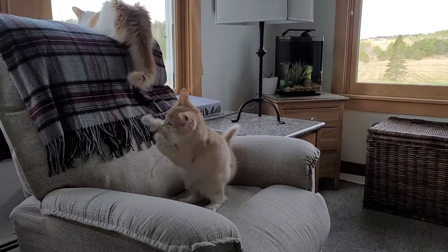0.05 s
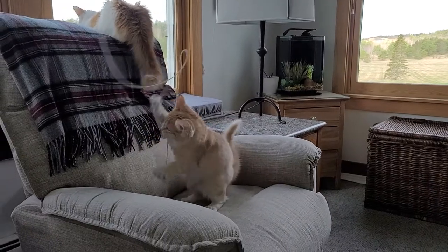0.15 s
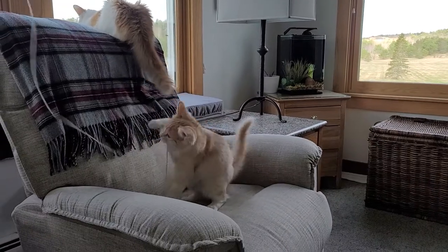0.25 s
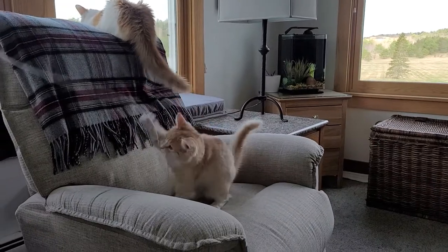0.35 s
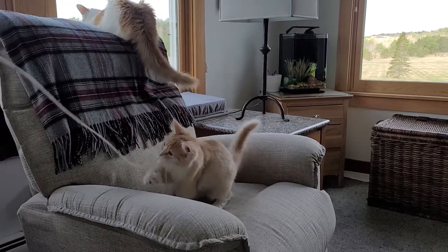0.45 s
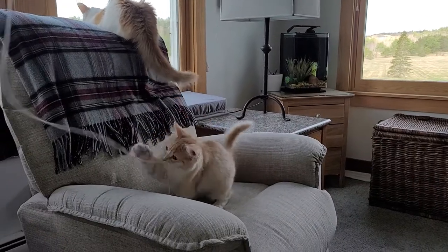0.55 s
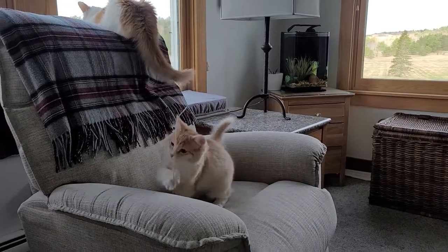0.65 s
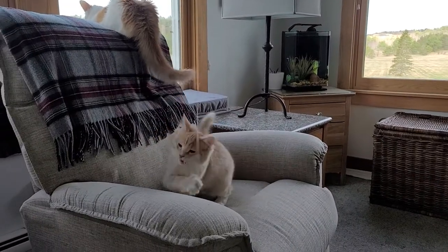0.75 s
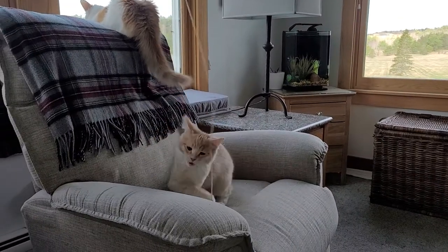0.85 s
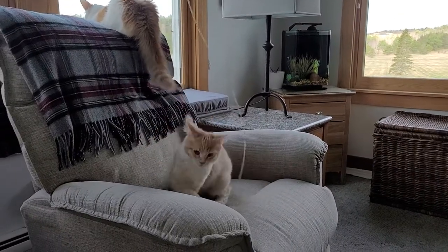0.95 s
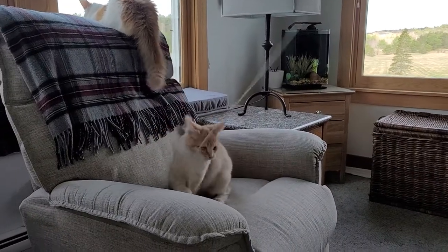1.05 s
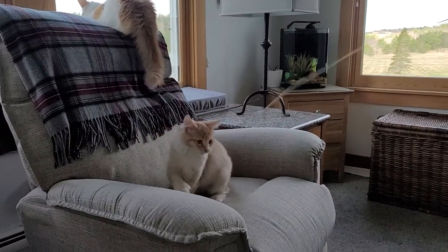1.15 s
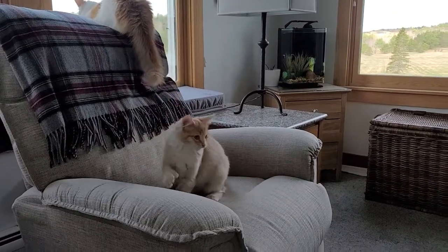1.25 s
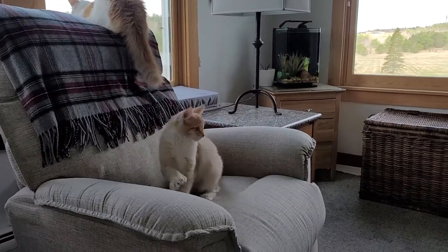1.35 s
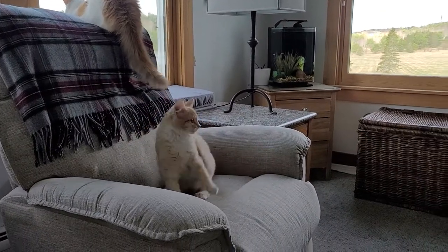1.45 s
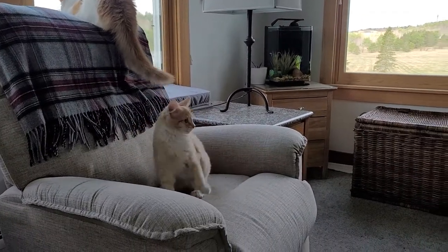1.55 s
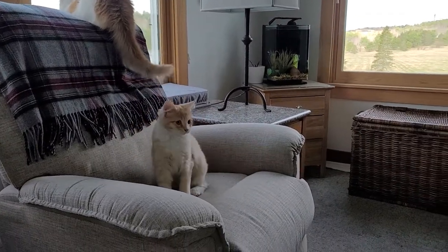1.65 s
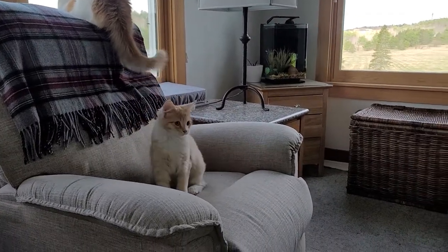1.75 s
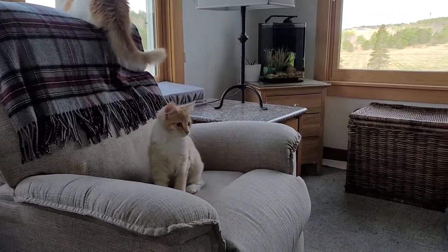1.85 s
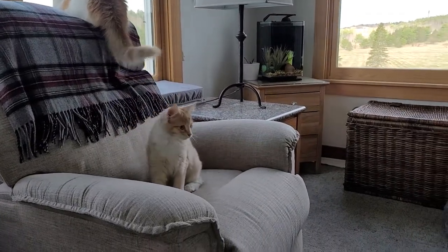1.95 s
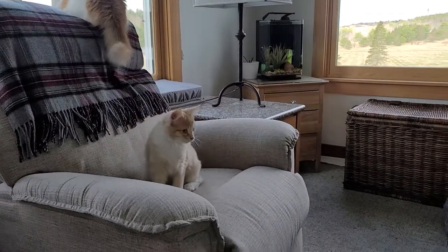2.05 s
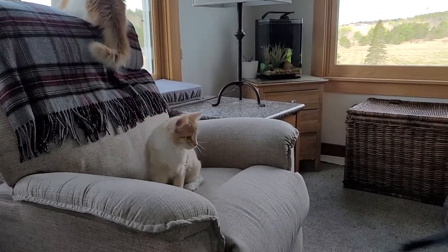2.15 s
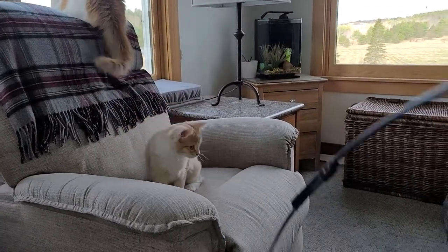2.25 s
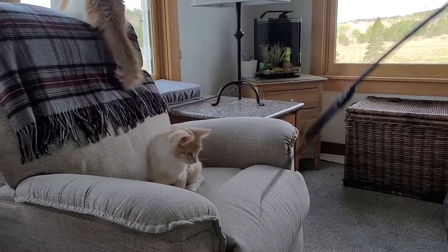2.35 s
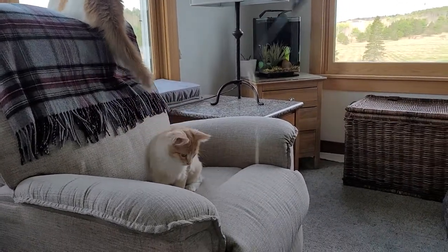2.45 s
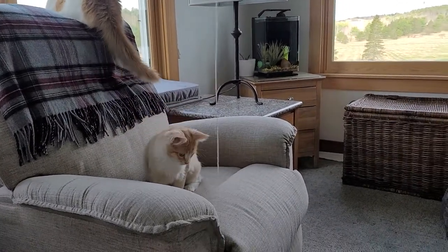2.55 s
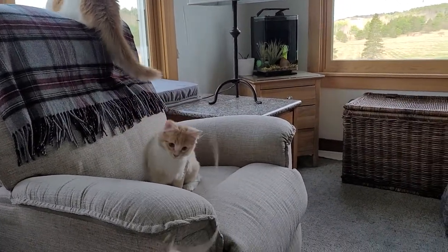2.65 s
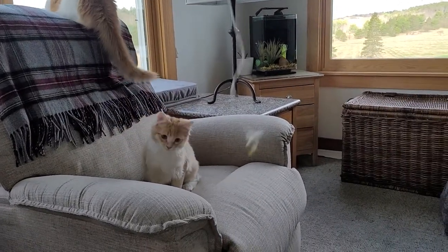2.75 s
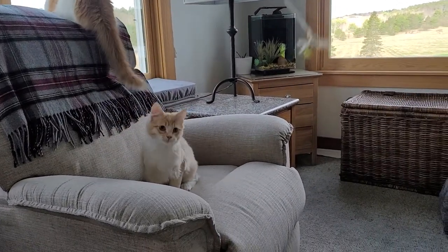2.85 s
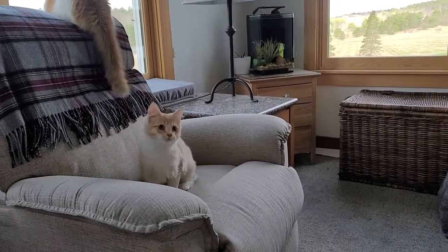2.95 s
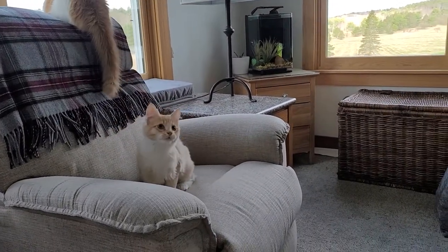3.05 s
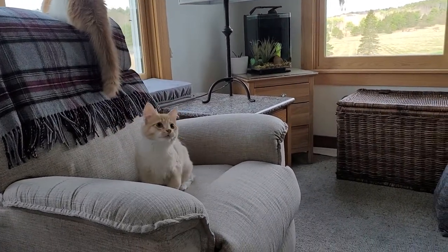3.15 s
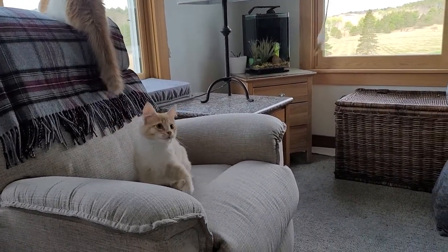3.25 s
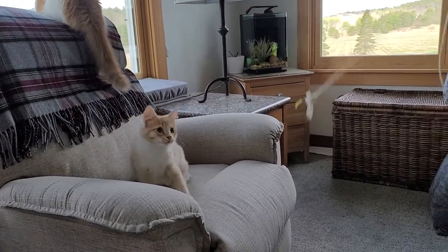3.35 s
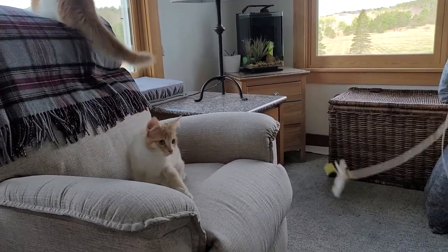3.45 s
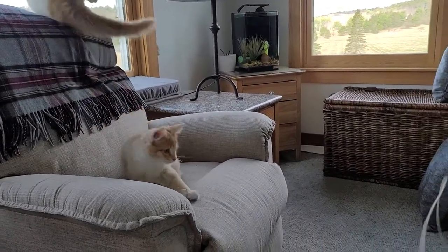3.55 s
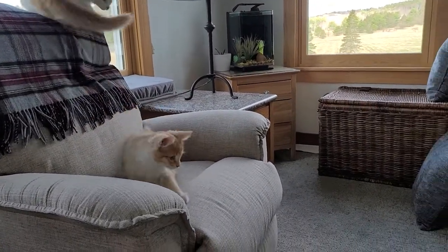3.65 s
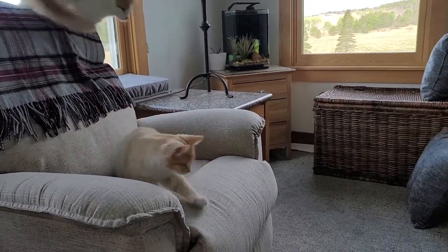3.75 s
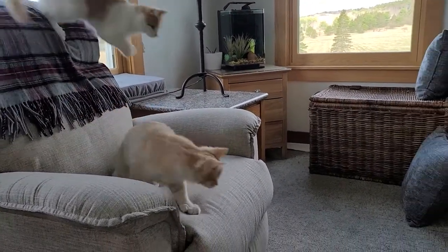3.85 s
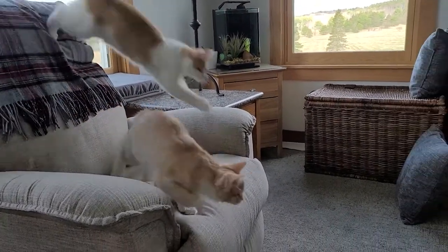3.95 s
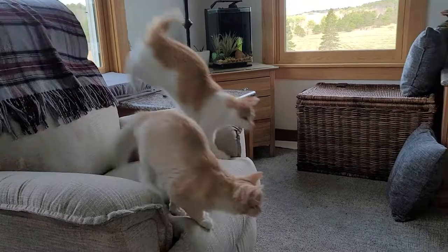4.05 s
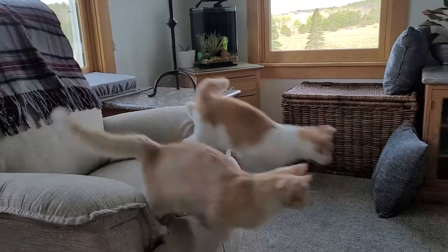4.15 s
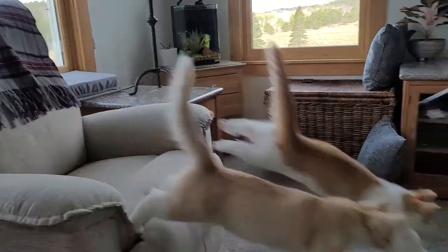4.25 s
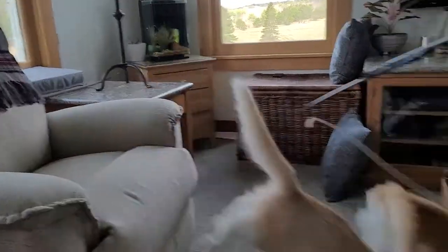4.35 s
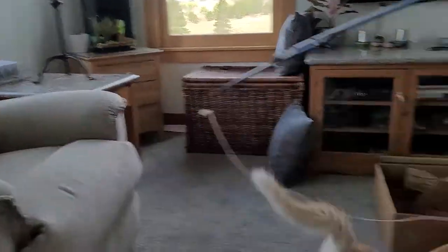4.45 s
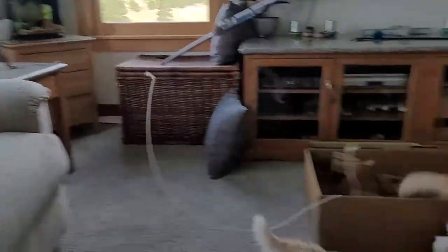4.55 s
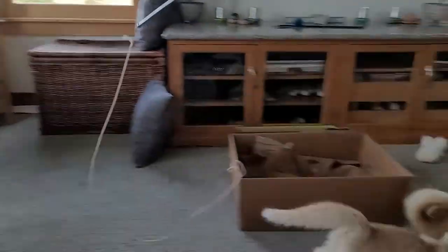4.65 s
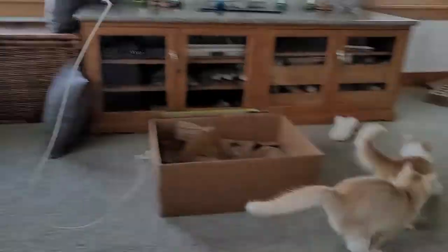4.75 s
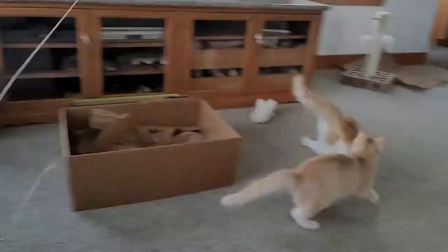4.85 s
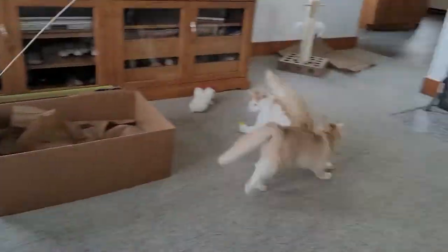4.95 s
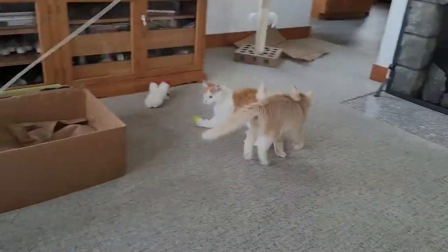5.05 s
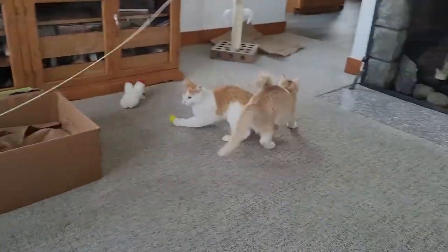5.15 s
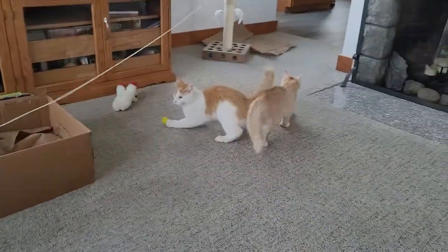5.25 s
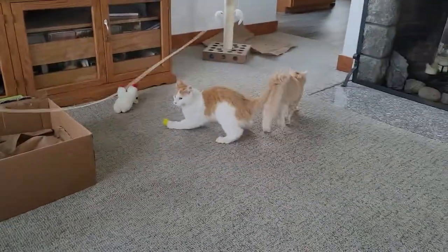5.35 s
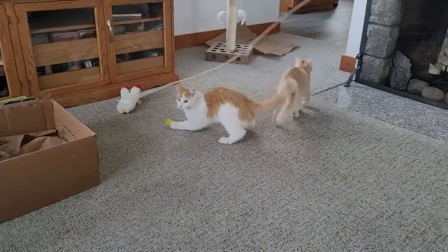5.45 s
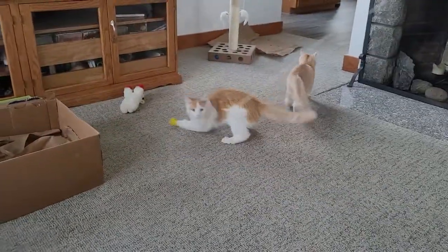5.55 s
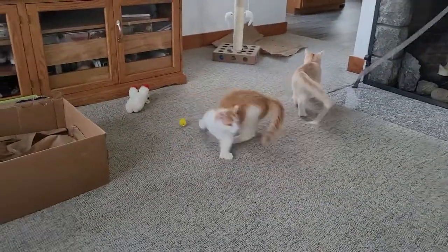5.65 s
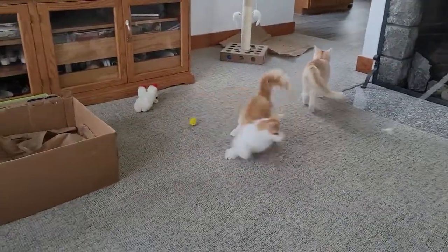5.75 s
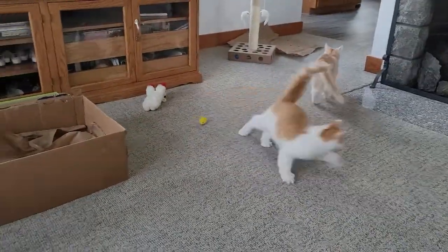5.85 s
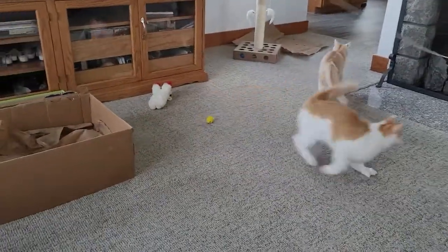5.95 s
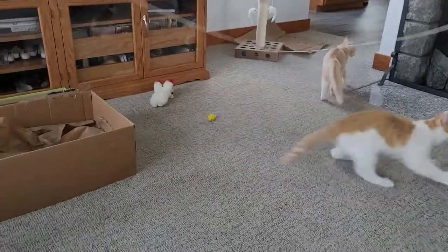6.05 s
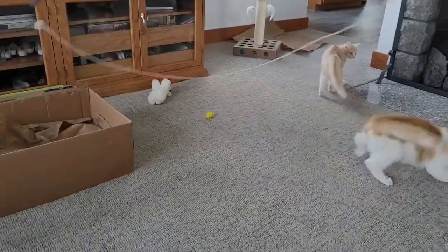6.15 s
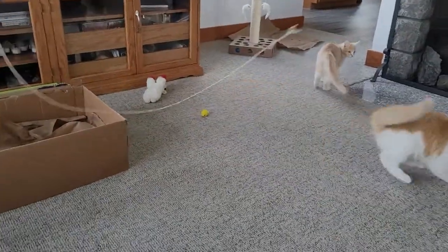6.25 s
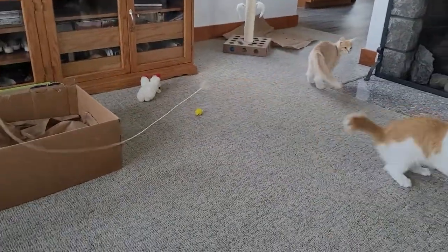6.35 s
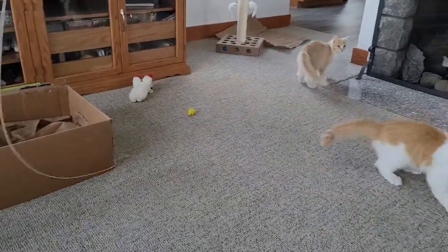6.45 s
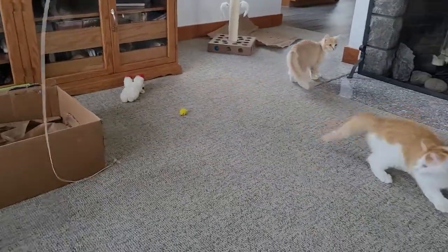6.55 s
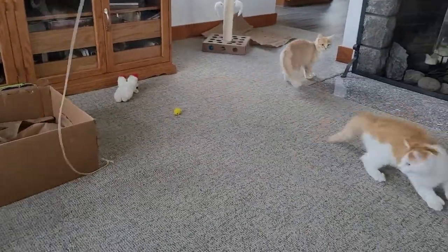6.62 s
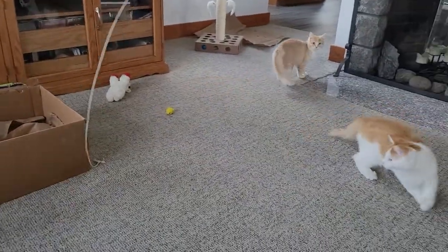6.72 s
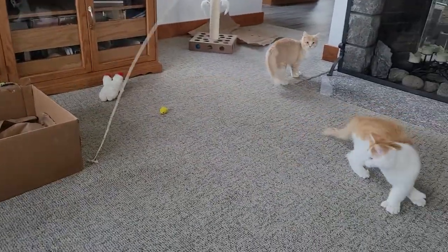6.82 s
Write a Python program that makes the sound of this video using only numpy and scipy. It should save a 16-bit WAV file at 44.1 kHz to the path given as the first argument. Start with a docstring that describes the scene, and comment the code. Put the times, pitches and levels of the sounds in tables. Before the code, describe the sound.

Cats leap off a knocking armchair with a heavy thump and scamper over carpet, after a toy rod cracks, over a low hum.

```python
"""Two cats chase a wand toy in a carpeted living room. At first an appliance hums, the toy's lure
taps lightly and a faint whistle sounds twice. Just after 2 s the springy rod cracks against the
furniture and its clasp rattles. Near 4 s the cats spring off an armchair, whose frame knocks hard.
They land with a heavy thump and scamper over the carpet with soft thuds and scuffs, shaking the
floor. From about 5 s the hum fades, and the clasp rattles again among the last steps."""
import sys
import numpy as np
from scipy import signal
from scipy.fft import rfft, irfft
from scipy.io import wavfile
from scipy.ndimage import uniform_filter1d

SR = 44100
rng = np.random.default_rng(int(sys.argv[2]) if len(sys.argv) > 2 else 0)


def pcm_store(signal):
    """Save signal as 16-bit PCM."""
    levels = np.round(np.clip(np.atleast_2d(signal), -1, 1) * 32767)
    wavfile.write(sys.argv[1], SR, levels.astype(np.int16).T)


N = 303628
TIME = np.arange(N) / SR
AGE = np.arange(SR // 2) / SR  # seconds since a hit
SIDES = np.array([[1], [-1]])  # plus on the left, minus on the right

# how hard the cats run about: t/s, level/dB
CHASE_EFFORT = [(4.0, -25.5), (4.15, -4), (4.5, 14), (4.8, 13.5), (5.2, 2), (5.5, -11), (5.8, 3), (6.2, 7),
                (6.88, -7)]


def paws(second_paw_s=0.031, first_weight_db=-9.5, second_touch_db=-8, slip_db=-17):
    """In each leap one paw touches and slips a little, then the other lands with the cat's weight."""
    # t/s, paw pad level/dB, pad f/Hz, carpet pat level/dB, weight level/dB, floor f/Hz
    leaps = [(3.823, -50, 371, -34.5, -45, 129), (4.066, -35.5, 155, -36, -32, 91),
             (4.165, -32, 148, -33.5, -21.5, 87), (4.387, -31.5, 253, -34.5, -19.5, 46.3),
             (4.469, -27.5, 231, -29.5, -17, 129.5), (4.482, -26.5, 160, -35, -24, 62),
             (4.549, -27.5, 146, -25, -22.5, 111), (4.566, -26, 151, -33.5, -23, 60),
             (4.622, -29.5, 150, -41, -26.5, 94.4), (4.677, -28.5, 212, -32, -25.5, 57),
             (4.805, -35, 268, -34.5, -34.5, 64), (4.909, -45, 232, -40, -45, 89.4),
             (5.212, -54, 290, -41, -64, 86.4), (5.724, -58, 160, -42, -40, 107),
             (5.797, -48, 144, -47.5, -44.5, 81), (5.882, -34, 247, -47, -43.5, 44),
             (5.947, -48, 200, -43, -39, 65), (6.068, -40.5, 146, -46, -31, 78),
             (6.127, -34, 285, -37, -28.5, 77), (6.514, -48, 270, -47, -37, 79)]
    out = np.zeros((2, N))
    for s, pad_db, pad_hz, pat_db, weight_db, floor_hz in leaps:
        pad, carpet, weight = undb([pad_db - 4, pat_db - 6, weight_db - 4])
        first, second = (pad * thump(pad_hz) + carpet * pat() for _ in range(2))
        add(out, s, first + weight * undb(first_weight_db) * boom(floor_hz))
        add(out, s + second_paw_s, undb(second_touch_db) * second + weight * boom(floor_hz))
        slip = brush(swell_s=.018, fade_s=0.021, tilt_db=-1.5, peak_hz=1350)
        add(out, s, carpet * undb(slip_db) * slip)
    return out


def patter(steps_per_s=12, step_db=-68, scatter_db=4, pad_hz=190, pat_db=-2):
    """Light, uneven steps fall between the leaps, louder when the cats run harder."""
    out = np.zeros((2, N))
    times, effort_db = np.transpose(CHASE_EFFORT)
    beats = np.arange(times[0], times[-1] - .1, 1 / steps_per_s)
    for beat, (late, size, pitch) in zip(beats, rng.standard_normal((len(beats), 3))):
        s = min(beat + .3 * late / steps_per_s, TIME[-1])
        step = thump(pad_hz * 2 ** (.3 * pitch)) + undb(pat_db) * pat()
        db = step_db + np.interp(s, times, effort_db) + scatter_db * size
        add(out, s, undb(db) * step)
    return out


def thump(hz):
    """Something soft and padded comes down; deep thumps echo the least."""
    echo_db = 6 * min(np.log2(hz / 250), 0)
    return burst(room(swing(hz, cycles=0.86), echo_db, lag_ms=0.22 * rng.standard_normal()))


def pat():
    """A paw presses the carpet flat."""
    # tone of the pat: f/Hz, level/dB
    carpet_tone = [(120, -15), (330, 3.5), (620, 0.5), (850, -8), (1300, -20), (3000, -37.5), (8000, -51.5)]
    return burst(room(crack(carpet_tone), echo_db=3.9, lag_ms=.3 * rng.standard_normal()))


def boom(hz, spread_db=0.5):
    """The floor bounces under a weight, a little louder on one side."""
    balance = undb(spread_db * rng.standard_normal() * SIDES)
    return burst(balance * room(swing(hz, cycles=1.06), echo_db=-8))


def chair(level_db=2.5, rattle_gap_s=0.014, rattle_db=-12.5, loss_db=2.5):
    """Kicked by the leap, the chair's frame knocks; each knock bounces twice, ever softer."""
    # t/s, level/dB, added sharp edge level/dB
    knocks = [(4.194, -14.5, -8), (4.240, -4, -3), (4.266, 3.5, -21), (4.2764, -1.5, -1.5),
              (4.386, -20, -29)]
    out = np.zeros((2, N))
    for s, db, edge_db in knocks:
        add(out, s, knock(db, edge_db))
        for bounce in range(2):
            late_s = rattle_gap_s * (bounce + 1 + .15 * rng.standard_normal())
            add(out, s + late_s, knock(db + rattle_db - bounce * loss_db, edge_db))
    return undb(level_db) * out


def knock(db, edge_db, ring_db=-4, clack_db=2):
    """The frame hits its stop and rings, while the padded panels give a short clack."""
    # the frame's ringing notes: f/Hz, level/dB, time to fade by 60 dB/s
    frame_notes = [(650, -21, .16), (798, -4.5, 0.21), (867, 8.5, 0.048), (1205, 1.5, 0.12),
                   (1265, -14, .15), (1430, -40, .2), (1690, -7, 0.11), (2081, 1, 0.18), (2130, -25.5, .15),
                   (2570, -21, 0.14)]
    # tone of the hit: f/Hz, level/dB
    hit_tone = [(100, 3.5), (400, -12), (650, 3), (850, 1.5), (1050, 5.5), (1450, 2), (2100, -13.5),
                (3000, -12.5), (5000, -29.5), (8000, -67), (15000, -76)]
    edge = crack([(300, -19.5), (1200, 12.5), (1700, 18.5), (2200, 9.5),
                  (3200, -7), (6500, -7.5), (9000, -25), (15000, -37)])
    cushion = 1 - np.exp(-AGE / .0007)
    clack = cushion * ring([(717, 0.0039, 0.0091), (1385, 0, 0.0072)])
    contact = chatter(crack(hit_tone) + undb(edge_db) * edge, length_s=.0012, chatter_db=6)
    hit = contact + undb(clack_db) * unit_energy(clack) + undb(ring_db) * ring(frame_notes)
    return undb(db) * room(unit_energy(hit), echo_db=-2.5 - 0.22 * db, lag_ms=0.065)


def wand(level_db=-3, ring_db=-9, snap_db=-7, lean_right_db=2):
    """The springy rod whips the furniture, rings and bounces; its tip snaps on the first hit."""
    # the rod's hits: t/s, level/dB, treble tilt/dB per octave
    lashes = [(2.2371, 1.5, 2.5), (2.241, -4, -2), (2.2475, -1.5, -1.5), (2.257, -8.5, -6)]
    # tone of a hit: f/Hz, level/dB
    lash_tone = [(100, -16), (240, 0.5), (450, -6.5), (680, -0.5), (900, -12), (1400, 0.5), (1980, 3),
                 (2700, -4.5), (3700, -13), (5200, -9), (8500, -15), (15000, -24.5)]
    # the rod's ringing notes: f/Hz, level/dB, time to fade by 60 dB/s
    rod_notes = [(295, -4.5, 0.1), (1530, -4, 0.11), (1990, 7.5, 0.079), (3010, -17, 0.17),
                 (4190, -21, .08), (5240, -22, 0.078), (5870, -14.5, .1), (6780, -21, 0.096),
                 (8700, -15.5, .15)]
    # tone of the tip's dry snap: f/Hz, level/dB
    snap_tone = [(300, -25.5), (1200, -10), (2000, 2), (3700, -13.5), (5400, -1.5), (7000, -4.5),
                 (8800, -15), (11500, -7), (15000, -16)]
    out = np.zeros((2, N))
    for s, db, tilt_db in lashes:
        contact = chatter(crack(lash_tone, tilt_db), length_s=.0015, chatter_db=7)
        hit = unit_energy(contact + undb(ring_db) * ring(rod_notes))
        add(out, s, undb(db + level_db) * room(hit, echo_db=0, lag_ms=-0.048))
    snap = room(chatter(crack(snap_tone), length_s=0.00031, chatter_db=2.5), echo_db=-9.5)
    add(out, lashes[0][0], undb(snap_db - lean_right_db * SIDES) * snap)
    return out


def lure(level_db=-3, bounce_s=.016, bounce_db=-12.5, light_hit_db=-52):
    """The lure on the string taps cloth and wood and bounces; a solid hit also tocks and thuds."""
    # t/s, level/dB, treble tilt/dB per octave, thud level/dB, echo level/dB
    taps = [(0.253, -27.5, -7, -50.5, -4), (0.438, -37, 14, -85, 0), (0.473, -42, 10, -85, -3),
            (1.4151, -31, 4.5, -83, -7.5), (2.296, -7.5, -4.5, -25.5, -0.5), (2.617, -19, 2, -80, -5),
            (2.665, -12, -2.5, -65, 0), (2.6794, -3.5, -4, -44, -12), (3.893, -26, -4.5, -79, 7),
            (4.707, -18, 0, -53.5, 1), (5.266, -33, 10, -80, -3), (5.609, -18.5, 1, -48, 3.5),
            (5.936, -28.5, -4.5, -74, 4)]
    out = np.zeros((2, N))
    for s, db, tilt_db, thud_db, echo_db in taps:
        add(out, s, undb(db + level_db) * tap(tilt_db, echo_db))
        add(out, s + bounce_s, undb(db + level_db + bounce_db) * tap(tilt_db, echo_db))
        octaves_down = max(thud_db - light_hit_db, 0) / 22  # harder hits tock deeper
        tock = undb(min(thud_db + 3, -40)) * thump(hz=385 * 2 ** -octaves_down)
        thud = undb(thud_db - 2.5) * boom(hz=83)
        add(out, s, thud + tock)
    return out


def tap(tilt_db, echo_db, lean_left_db=1.24):
    """One rough touch of the lure."""
    # tone of the touch: f/Hz, level/dB
    tap_tone = [(100, -8.5), (240, 0), (450, 5.5), (1000, 0.5), (1600, 3), (2400, -0.5), (3400, -3.5),
                (5500, -9.5), (8500, -20), (15000, -37)]
    contact = chatter(crack(tap_tone, tilt_db), length_s=0.0016, chatter_db=5.5)
    return undb(lean_left_db * SIDES) * room(contact, echo_db, lag_ms=0.064)


def scuffs():
    """The wand swishes and claws drag over the chair's cloth and the carpet."""
    # t/s, level/dB, swell/s, fade/s, treble tilt/dB per octave, ringing f/Hz
    strokes = [(2.175, -46, 0.058, 0.0079, 0.5, 1700), (2.328, -57.5, 0.01, 0.098, 1.5, 1710),
               (2.549, -50.5, 0.0031, 0.0081, -5, 1190), (2.654, -44.5, 0.0082, 0.0034, -1.5, 900),
               (3.885, -54, 0.0069, 0.009, 2.5, 2850), (4.069, -45, 0.042, 0.066, -5, 1330),
               (4.17, -36.5, 0.03, 0.032, -6.5, 1520), (4.549, -52.5, 0.0062, 0.17, -0.5, 900),
               (4.826, -48.5, 0.0055, 0.046, 8, 12700), (5.252, -49.5, 0.016, 0.0079, -2.5, 1840)]
    out = np.zeros((2, N))
    for s, db, swell_s, fade_s, tilt_db, peak_hz in strokes:
        add(out, s, undb(db) * brush(swell_s, fade_s, tilt_db, peak_hz))
    return out


def brush(swell_s, fade_s, tilt_db, peak_hz, hollow_db=1):
    """Fibres catch and let go, and the brushed thing rings with a hollow note."""
    # tone of the rubbing: f/Hz, level/dB
    scuff_tone = [(200, -11), (700, 7), (1500, 3.5), (2600, 5.5), (4000, -4), (6500, -5), (8500, -14),
                  (15000, -20.5)]
    fibres = tint(spray(swell_s, fade_s, grain_db=7), scuff_tone, tilt_db)
    hollow = signal.lfilter(*signal.iirpeak(peak_hz, 4, fs=SR), fibres)
    return burst(room(fibres + undb(hollow_db) * hollow, echo_db=3.5, lag_ms=0.17))


def clasp():
    """The clasp on the string rattles in short flurries of tiny touches."""
    # t/s, level/dB, swell/s
    clinks = [(2.509, -65, 0.015), (2.539, -62, 0.011), (6.445, -59.5, 0.014), (6.505, -65, 0.016),
              (6.608, -74.5, 0.013)]
    # tone of the clasp: f/Hz, level/dB
    clasp_tone = [(1500, -10), (3800, -7), (4700, -1.5), (5400, -4), (6100, 6.5), (6900, 2.5), (8300, -17),
                  (10700, -11), (15000, -14)]
    out = np.zeros((2, N))
    for s, db, swell_s in clinks:
        rattle = tint(spray(swell_s, fade_s=0.0032, grain_db=4), clasp_tone)
        add(out, s, undb(db) * burst(room(rattle, echo_db=3.5)))
    return out


def whistles():
    """A thin, wavering tone slides up and hangs in the room."""
    # t/s, f/Hz that the slide heads for, level/dB
    slides = [(0.04, 7900, -73), (1.565, 7570, -76)]
    out = np.zeros((2, N))
    for s, top_hz, db in slides:
        waver = unit(uniform_filter1d(rng.standard_normal(len(AGE)), size=90))
        hz = top_hz * (1 - 0.071 * np.exp(-AGE / 0.0565) + 0.027 * waver)
        loudness = (AGE / .02) ** 2 * np.exp(-AGE / 0.016)
        tone = loudness * np.sin(2 * np.pi * np.cumsum(hz) / SR)
        add(out, s, undb(db) * burst(room(tone, echo_db=6.5)))
    return out


def floor_rumble(rumble_db=-58):
    """The floor keeps shaking while the cats run about."""
    shake = tint(diffuse(N), [(20, 9), (42, -2), (80, 7), (130, -8.5),
                              (300, -26), (650, -22), (1200, -50.5), (4000, -53)])
    return undb(rumble_db + np.interp(TIME, *np.transpose(CHASE_EFFORT))) * unit(shake)


def appliance(whine_hz=1290, whine_db=-27, fade_from_s=4.9):
    """A motor hums and whines, then fades, over steady tones and a soft, dull hiss."""
    # the motor's pitch: t/s, f/Hz
    motor_pitch = [(0.0, 83.9), (0.29, 85.45), (2.9, 88.7), (4.0, 88.34)]
    # steady electrical tones: f/Hz, level/dB
    steady_tones = [(60, -83.5), (119.6, -71), (442, -79.5)]
    # tone of the steady background hiss, which drops sharply above 7 kHz: f/Hz, level/dB
    hiss_tone = [(25, -26.5), (55, -1), (75, 5.5), (110, 0), (140, -6.5), (260, -16), (450, -13),
                 (750, -12), (1000, -20.5), (1500, -19.5), (2500, -29.5), (7000, -39.5), (8200, -53.5),
                 (15500, -43)]
    hz = np.interp(TIME, *np.transpose(motor_pitch))
    fading_s = np.maximum(TIME - fade_from_s, 0)
    hum_db = -52 - 33.5 * fading_s
    hiss_db = -58 - 1.24 * fading_s
    # the hum forms a standing wave in the room, so left and right differ a little
    hum = undb(hum_db + .5 * SIDES) * np.sin(2 * np.pi * np.cumsum(hz) / SR + 0.11 * SIDES)
    whine = unit(signal.lfilter(*signal.iirpeak(whine_hz, 50, fs=SR), diffuse(N)))
    steady = sum(undb(db) * np.sin(2 * np.pi * (f * TIME + rng.random())) for f, db in steady_tones)
    hiss = unit(tint(diffuse(N), hiss_tone))
    return np.sqrt(2) * (hum + steady) + undb(hum_db + whine_db) * whine + undb(hiss_db) * hiss


def room(x, echo_db, lag_ms=0):
    """The sound arrives directly, lag_ms later on the right, then as a wash of echoes that grow dull."""
    # how long the room echoes: f/Hz, time to fade by 60 dB/s
    echo_times = [(100, 0.27), (500, 0.26), (2000, 0.24), (6000, 0.19), (14000, 0.15)]
    hz, s, spectrum = signal.stft(diffuse(len(AGE)), SR)
    fade = undb(-60 * s / along(hz, echo_times)[:, None])
    tail = signal.istft(spectrum * fade, SR)[1][:, :len(AGE)]
    tail = unit_energy(tail * np.clip(AGE / 0.002 - .5, 0, 1))  # echoes start just after the sound
    direct = np.array([np.interp(AGE - max(ms, 0) / 1000, AGE, x, left=0) for ms in (-lag_ms, lag_ms)])
    echoes = signal.fftconvolve(x[None], tail, axes=1)[:, :len(AGE)]
    return direct + undb(echo_db) * echoes


def diffuse(size):
    """Noise from all around: left and right are alike in the bass, unrelated in the treble."""
    mid, side = rfft(rng.standard_normal((2, size)))
    alike = .9 * np.sinc(np.fft.rfftfreq(size, 1 / SR) / 650)
    return irfft(mid * np.sqrt(1 + alike) + side * np.sqrt(1 - alike) * SIDES, size)


def swing(hz, cycles):
    """A cushioned push: the swing builds over half a cycle and dies within a few."""
    turns = hz * AGE
    return np.sin(2 * np.pi * turns) * (1 - np.exp(-2 * turns)) * np.exp(-turns / cycles)


def ring(notes):
    """A struck thing rings with fading notes, a little different on every hit."""
    chance = rng.standard_normal((len(notes), 2)) * [1.5, .002]
    tones = (undb(db + strike_db) * np.sin(2 * np.pi * hz * (1 + detune) * AGE) * undb(-60 * AGE / fade_s)
             for (hz, db, fade_s), (strike_db, detune) in zip(notes, chance))
    return unit_energy(sum(tones))


def crack(tone, tilt_db=0):
    """The shortest click that has this tone, given as (f/Hz, level/dB) points."""
    cepstrum = irfft(np.log(response(len(AGE), tone, tilt_db)))
    # folding the second half onto the first packs the sound at the start
    cepstrum[1:] *= 2
    cepstrum[len(AGE) // 2:] = 0
    return unit_energy(irfft(np.exp(rfft(cepstrum))))


def chatter(x, length_s, chatter_db):
    """A rough contact: the first touch is followed by many smaller ones."""
    touches = undb(chatter_db) * unit_energy(rng.standard_normal(len(AGE)) * np.exp(-AGE / length_s))
    touches[0] += 1
    return unit_energy(signal.fftconvolve(x, touches)[:len(AGE)])


def spray(swell_s, fade_s, grain_db):
    """Crowded clicks of uneven size that swell and fade."""
    stroke = np.minimum(AGE / swell_s, 1) * np.exp(-np.maximum(AGE - swell_s, 0) / fade_s)
    catches = np.repeat(undb(grain_db * rng.standard_normal(len(AGE))), 30)[:len(AGE)]
    return stroke * catches * rng.standard_normal(len(AGE))


def tint(x, tone, tilt_db=0):
    """Shape a sound's bass and treble with (f/Hz, level/dB) points."""
    return irfft(rfft(x) * response(x.shape[-1], tone, tilt_db), x.shape[-1])


def response(size, tone, tilt_db):
    """Gain at each frequency, tilted by tilt_db per octave above 600 Hz."""
    hz = np.fft.rfftfreq(size, 1 / SR)
    return undb(along(hz, tone) + tilt_db * np.log2(np.maximum(hz, 600) / 600))


def along(hz, points):
    """Read between (f/Hz, value) points, with octaves evenly spaced."""
    f, value = np.transpose(points)
    return np.interp(np.log(hz + 1), np.log(f), value)


def undb(db):
    """Turn decibels into a gain."""
    return 10 ** (np.asarray(db) / 20)


def unit(x):
    """Scale to an average power of 1."""
    return x / np.sqrt(np.mean(x ** 2))


def unit_energy(x):
    """Scale to an energy of 1 per channel."""
    return unit(x) / np.sqrt(x.shape[-1])


def burst(x):
    """Scale so that the loudest hundredth of a second has a power of 1."""
    power = np.mean(np.atleast_2d(x) ** 2, axis=0)
    return x / np.sqrt(uniform_filter1d(power, size=441).max())


def add(out, s, x):
    """Mix a sound in, starting at s seconds."""
    start = max(int(s * SR), 0)
    out[:, start:start + x.shape[-1]] += x[:, :N - start]


def scene():
    """The cats and their toy, over the room's quiet background."""
    play = paws() + patter() + chair() + wand() + lure() + clasp() + scuffs()
    return play + whistles() + appliance() + floor_rumble()


def record(dry):
    """Cut away the highest treble."""
    top_hz = 15900
    return signal.sosfilt(signal.ellip(10, .2, 70, top_hz, fs=SR, output="sos"), dry)


dry = scene()
out = record(dry)
pcm_store(out)
```